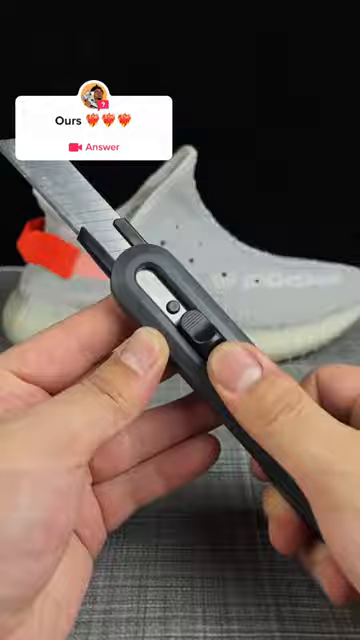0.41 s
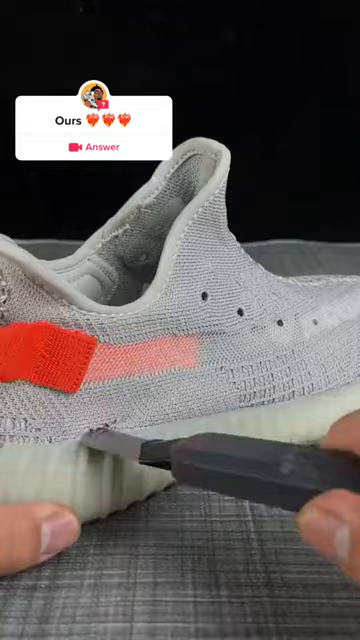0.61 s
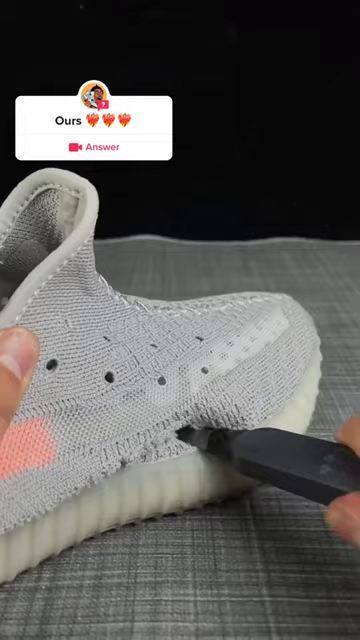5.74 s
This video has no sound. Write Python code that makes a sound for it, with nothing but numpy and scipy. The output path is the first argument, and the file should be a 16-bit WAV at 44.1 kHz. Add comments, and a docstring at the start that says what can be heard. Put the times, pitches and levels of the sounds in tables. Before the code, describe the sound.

A utility knife blade ratchets out with a quick run of clicks from 0.1 to 0.4 seconds. It brushes softly over a knit shoe, and a first stitch snaps at about 0.8 seconds. From 1.6 to 5.2 seconds the blade pokes along the seam about three times a second. Each push gives a short crunch of yarn, usually with a sharp snap, loudest between 1.6 and 3.4 seconds. In between, the foam sole thuds softly and the loose blade ticks in its holder. The sound drops out for an instant at 5.4 seconds. Then the blade saws back and forth through the knit until about 7 seconds, in quick scratchy strokes with gritty tearing and a few more snaps. Everything is close, in a small quiet room, over a faint hiss and a slowly swelling low hum.

```python
"""A small quiet room, where a utility knife works on a knit shoe close by.
The blade ratchets out, then pokes along the seam: stick-slip friction makes the yarn crunch, stitches
snap under tension, the foam sole thuds and the loose blade ticks against its holder. After a brief
dropout the blade saws to and fro through the knit, over a faint hiss and a low hum."""
import sys
import numpy as np
from scipy import signal
from scipy.fft import rfft, irfft
from scipy.io import wavfile
from scipy.ndimage import uniform_filter1d

SR = 44100
rng = np.random.default_rng(int(sys.argv[2]) if len(sys.argv) > 2 else 0)


def generate_wav(sig):
    """Save sig (samples, or channels by samples) to the path in sys.argv[1] as 16-bit PCM at SR."""
    pcm = np.round(np.clip(np.atleast_2d(sig).T, -1, 1) * 32767).astype(np.int16)
    wavfile.write(sys.argv[1], SR, pcm)


N = 317520
TIME = np.arange(N) / SR
AGE = np.arange(SR // 4) / SR  # time since an impact
HAND_TIME = np.arange(0, N / SR, .002)  # coarse time base of the strokes
DROPOUT_START_S, DROPOUT_END_S = 5.402, 5.44

# spectra of the yarn's low rasp, its high fizz and a light brush over it: frequency_hz, density_db
RASP_SPECTRUM = [(40, -1.5), (150, 5), (310, -1), (550, -1), (1100, -1), (2050, -11), (3400, -17.5),
                 (7000, -23), (16000, -39)]
FIZZ_SPECTRUM = [(600, -2), (2200, 4.5), (4500, -4), (6600, -7.5), (9500, -6.5), (16000, -16)]
BRUSH_SPECTRUM = [(100, -1), (300, -2), (520, 2.5), (1100, -6), (1900, -7.5), (3200, -19.5), (16000, -37)]
# spectrum of a crisp contact: frequency_hz, density_db
TICK_SPECTRUM = [(500, -8), (1500, 6.5), (10000, -0.5), (16000, -10)]


def amp(db):
    """Decibels to amplitude ratio."""
    return 10 ** (np.asarray(db) / 20)


def unit(x):
    """Normalisation to rms 1."""
    return x / np.sqrt(np.mean(x ** 2) + 1e-20)


def unit_onset(x, size=88):
    """Normalisation to rms 1 over the first samples."""
    return x / np.sqrt(np.mean(x[:size] ** 2) + 1e-20)


def log_interp(points, hz):
    """Interpolation on a logarithmic frequency axis."""
    frequency, value = np.transpose(points)
    return np.interp(np.log(hz + 1), np.log(frequency), value)


def add(mix, start_s, sound):
    """Superposition of a sound on the mix."""
    part = mix[max(round(start_s * SR), 0):][:len(sound)]
    part += sound[:len(part)]


def colour(x, spectrum):
    """Spectral shaping, at rms 1."""
    gain = amp(log_interp(spectrum, np.fft.rfftfreq(len(x), 1 / SR)))
    return unit(irfft(rfft(x) * gain, len(x)))


def noise(spectrum, size=len(AGE)):
    """Coloured Gaussian noise of rms 1."""
    return colour(rng.standard_normal(size), spectrum)


def decay(t60):
    """Exponential damping: 60 dB in t60 seconds."""
    return np.exp(-np.log(1000) * AGE / t60)


def impulses(per_s, spread_db, size=len(AGE)):
    """A Poisson process of small slips or contacts, a few of them large."""
    height = amp(spread_db * np.minimum(rng.exponential(1, size), 4))
    return height * rng.choice([-1, 1], size) * (rng.random(size) < per_s / SR)


def impact(spectrum, rebound_db, rebound_t60):
    """Impulsive excitation: a hard contact and its rebounds, with the energy of 2 ms at rms 1."""
    hits = amp(rebound_db) * impulses(4000, 1.0) * decay(rebound_t60)
    hits[0] = 1
    sound = colour(np.roll(hits, 32), spectrum) * (1 - decay(.001)) * decay(.5)
    return unit(sound) * np.sqrt(.002 / AGE[-1])


def stitch_snaps(twang_cycles=2.03, load_s=.00035, ring_hz=2150, crunch_s=0.0059, lead_s=0.05):
    """Sudden release of tension: a thread crunches, cracks and twangs; blade and shoe vibrate."""
    # parting stitches: time_s, level_db, pitch_hz, crack_db, shudder_db, crunch_db
    stitches = [(0.8408, -11.5, 1980, -43, -37, -26), (0.8486, -5.5, 1540, -34, -33.5, -29),
                (1.652, -0.5, 790, -15.5, -21.5, -60), (2.012, -1.5, 1020, -19.5, -23.5, -39),
                (2.3376, -3.5, 1000, -24, -21.5, -31.5), (2.651, -14.5, 880, -32.5, -50.5, -30.5),
                (2.675, -1.5, 1220, -20.5, -25, -24.5), (2.8724, -14, 1020, -55, -36, -35.5),
                (3.035, -5.5, 885, -22, -22, -32), (3.3631, -2, 913, -18, -18.5, -32),
                (3.698, -18, 800, -43, -23.5, -42), (4.043, -6.5, 960, -35.5, -20.5, -30),
                (4.392, -39, 500, -50, -22.5, -47), (4.7266, -15, 620, -55, -21, -60),
                (5.0436, -3.5, 840, -31.5, -22.5, -30.5), (5.3409, -25.5, 1020, -43, -36, -70),
                (5.712, -11, 1050, -29.5, -27, -28.5), (5.7495, -11.5, 1110, -35, -25.5, -45),
                (6.2323, -8, 400, -29.5, -40, -33), (6.4955, -20.5, 2160, -29, -55, -35)]
    # spectra of the crack and of the shoe's shudder: frequency_hz, density_db
    crack_spectrum = [(1000, 4), (2500, 6), (4500, -1), (6500, -7), (11000, -2.5), (16000, -26)]
    shudder_spectrum = [(40, -3), (150, 1), (290, -11.5), (420, -4), (900, -10.5), (1800, -23), (5000, -47),
                        (15000, -43)]
    direct, body = np.zeros(N), np.zeros(N)
    t = AGE - lead_s  # zero at the moment of parting
    for s, db, hz, crack_db, shudder_db, crunch_db in stitches:
        loading = np.exp(np.minimum(t, 0) / load_s)
        release = np.exp(-np.log(1000) * np.maximum(t, 0) * hz / twang_cycles)
        add(direct, s - lead_s, amp(db) * loading * release * np.sin(2 * np.pi * hz * t))
        blade_ring = np.sin(2 * np.pi * ring_hz * rng.uniform(.85, 1.15) * AGE) * decay(0.0064)
        add(direct, s, amp(db - 13) * blade_ring)
        add(direct, s - 2 * load_s, amp(crack_db) * impact(crack_spectrum, -10, 0.042))
        crunch = colour(impulses(1700, 0.92), RASP_SPECTRUM) * np.exp(-abs(t) / crunch_s)
        add(body, s - lead_s, 2 * amp(crunch_db) * crunch)
        # neighbouring loops give way in quick succession
        cascade = colour(impulses(1200, 0.75), shudder_spectrum) * decay(0.069) * (1 - decay(0.0033))
        add(body, s, amp(shudder_db) * unit_onset(cascade, size=800))
    return direct + amp(-3) * shoe_resonance(body)


def slider_ratchet(slide_db=-35, fade_db=-8):
    """Impact and sliding friction: the slider clacks over notches as the blade hisses along its track."""
    # jumps of one notch: start_s, level_db, t60_s
    notches = [(0.103, -23.5, 0.068), (0.122, -11, 0.0043), (0.138, -20.5, 0.035), (0.1537, -24, 0.033),
               (0.1719, -20.5, 0.034), (0.1913, -21.5, 0.042), (0.209, -23, 0.059), (0.2307, -25.5, 0.031),
               (0.2598, -22.5, 0.032), (0.2979, -19.5, 0.018), (0.3096, -37, 0.013), (0.3654, -17, 0.0087)]
    # bumps against the plastic handle: start_s, level_db
    bumps = [(0.101, -28), (0.1222, -27), (0.2973, -24), (0.3632, -25)]
    # spectra of the slider, the steel track and the handle: frequency_hz, density_db
    slider_spectrum = [(100, -42), (750, -17), (1350, 0.5), (2200, 3.5), (2750, -3.5), (3650, 7),
                       (4500, -0.5), (5400, 1.5), (6500, -5), (9800, 3), (16000, -3.5)]
    track_spectrum = [(200, -45), (900, -18), (1900, -4), (3800, -4.5), (6500, -9), (8000, -2.5),
                      (10300, -0.5), (16000, -28)]
    handle_spectrum = [(40, -25), (200, -4), (800, -2), (1400, 3), (2200, -11.5)]
    out = np.zeros(N)
    for s, db, t60 in notches:
        teeth = impulses(7500, 0.31) * decay(t60) * (1 - decay(0.0013))
        clack = unit_onset(colour(np.roll(teeth, 20), slider_spectrum) * decay(1))
        rattle = colour(impulses(3000, 2.0), track_spectrum) * decay(.07) * (1 - decay(.02))
        add(out, s, amp(db) * clack + amp(db / 2 - 19) * rattle)
    for s, db in bumps:
        add(out, s, amp(db) * impact(handle_spectrum, -4.0, 0.012))
    start_s, stop_s = notches[0][0], notches[-1][0]
    size = int((stop_s - start_s) * SR)
    slowing = amp(np.linspace(0, fade_db, size)) * signal.windows.tukey(size, .2)
    add(out, start_s, amp(slide_db) * noise(track_spectrum, size) * slowing)
    return out


def blade_ticks(buzz_db=-21, buzz_t60=0.089):
    """Impact with rebound: the loose blade hits its holder, exciting broad resonances and a faint buzz."""
    # knocks in the holder: start_s, level_db, mode_hz, edge_db
    knocks = [(1.0678, -36, 2350, -38), (1.7787, -30, 2400, -36.5), (2.0573, -35.5, 2740, -32),
              (2.1451, -21, 2450, -31), (2.486, -34, 2560, -34.5), (2.794, -34, 2370, -64),
              (2.8092, -19, 2560, -35), (3.063, -41, 2670, -37), (3.163, -33.5, 2120, -33),
              (3.383, -30, 2830, -34), (3.507, -32, 2250, -63), (3.7313, -40, 2640, -42),
              (3.8434, -18, 2430, -37), (4.428, -39.5, 2660, -45), (4.5245, -19, 2530, -32),
              (4.6999, -36.5, 2688, -36.5), (4.772, -40, 2830, -50), (5.07, -45, 3070, -47),
              (5.1579, -25, 2300, -53)]
    # broad resonances of the blade: ratio_to_mode, density_db
    blade_resonances = [(.2, -19.5), (.6, -15), (1, 6.5), (1.35, -4.5), (1.66, 0.5), (2.15, -4), (2.7, -31),
                        (3.3, -17), (6.5, -56)]
    out = np.zeros(N)
    for s, db, hz, edge_db in knocks:
        spectrum = [(ratio * hz, level) for ratio, level in blade_resonances]
        click = amp(db) * impact(spectrum, -8, 0.023)
        edge = amp(edge_db) * impact(TICK_SPECTRUM, -9, 0.053)
        buzz = amp(db + buzz_db) * noise(spectrum) * decay(buzz_t60)
        add(out, s, amp(2) * (click + edge) + buzz)
    return out


def handle_clicks(t60=0.012, mode_ratio=1.163, contact_db=-18):
    """Free vibration: a crisp contact rings the handle's plastic shell in a close pair of modes."""
    # contacts of slider or grip: start_s, level_db, pitch_hz
    contacts = [(0.1218, -9.5, 1276), (1.9332, -26.5, 2030), (1.9642, -15.5, 2400), (6.2319, -14.5, 2116)]
    out = np.zeros(N)
    for s, db, hz in contacts:
        phase = 2 * np.pi * hz * AGE
        ring = (np.sin(phase) - np.sin(mode_ratio * phase)) * decay(t60) * (1 - decay(0.0034))
        contact = impact(TICK_SPECTRUM, -6, .03)
        add(out, s, amp(db) * (ring + amp(contact_db) * contact))
    return out


def sole_thuds(t60=0.072, sag=0.84, mode_ratio=1.77, upper_db=-7):
    """Damped oscillation: the foam sole springs back, its pitch sagging as the pressure comes off."""
    # flexes of the sole: start_s, level_db, mid_pitch_hz
    flexes = [(0.891, -22.5, 97), (1.82, -19, 114), (2.16, -17.5, 140), (2.498, -24, 107), (2.83, -19, 147),
              (2.858, -20.5, 160), (2.9333, -17, 351), (4.378, -17, 145), (4.518, -23, 113),
              (4.726, -19, 139), (5.028, -16.5, 159), (6.073, -26, 170), (6.231, -17, 196)]
    out = np.zeros(N)
    for s, db, hz in flexes:
        pitch_hz = hz * (1 + sag * (decay(0.061) - .5))
        phase = 2 * np.pi * np.cumsum(pitch_hz) / SR
        wobble = np.sin(phase) + amp(upper_db) * np.sin(mode_ratio * phase)
        add(out, s, amp(db) * wobble * decay(t60) * (1 - decay(0.0082)))
    return out


def stroke_power(start_s, hold_s, db, shape):
    """Exponential swell, hold and fade of one stroke, as rasp power and fizz power."""
    rise, fall, fizz_db = shape
    before_s = np.maximum(start_s - HAND_TIME, 0)
    after_s = np.maximum(HAND_TIME - start_s - hold_s, 0)
    level = db - rise * before_s - fall * after_s
    return amp([level, level + fizz_db]) ** 2


def poking_power(push_s=0.033, pull_s=0.039):
    """Incoherent sources add in power: the rasp and fizz of each push into the seam and each pull back."""
    # pokes: deepest_s, push_db, wait_s, pull_db
    pokes = [(1.668, -37.5, 0.14, -41.5), (1.988, -36.5, 0.17, -42.5), (2.33, -37.5, .19, -40.5),
             (2.673, -37, 0.17, -36.5), (3.052, -38.5, 0.13, -44.5), (3.358, -36, 0.14, -46),
             (3.7, -36, 0.12, -47), (4.047, -36.5, 0.14, -54), (4.384, -37.5, 0.13, -45),
             (4.709, -34.5, 0.14, -52), (5.034, -40, 0.15, -50)]
    # stroke envelopes: rise_db_per_s, fall_db_per_s, fizz_over_rasp_db
    push_shape = (600, 430, -12)
    pull_shape = (550, 260, -9)
    return sum(stroke_power(s - push_s / 2, push_s, push_db, push_shape)
               + stroke_power(s + wait_s, pull_s, pull_db, pull_shape)
               for s, push_db, wait_s, pull_db in pokes)


def sawing_power(return_s=0.058):
    """Reciprocating friction, as rasp and fizz power: each cut bites at once, each return creeps in."""
    # saw strokes: start_s, hold_s, cut_db, wait_s, return_db
    saws = [(5.431, 0.0091, -39, 0.12, -42.5), (5.692, 0.052, -37, 0.19, -45.5),
            (6.018, 0.059, -38.5, 0.16, -44.5), (6.321, 0.014, -33.5, 0.15, -42.5),
            (6.61, 0.058, -35, 0.18, -39.5), (6.917, 0.063, -35, 0.17, -40)]
    # stroke envelopes: rise_db_per_s, fall_db_per_s, fizz_over_rasp_db
    cut_shape = (870, 374, -7.5)
    return_shape = (345, 500, -2.5)
    return sum(stroke_power(s, hold_s, cut_db, cut_shape)
               + stroke_power(s + wait_s, return_s, return_db, return_shape)
               for s, hold_s, cut_db, wait_s, return_db in saws)


def power_to_gain(power):
    """Amplitude is the square root of power, here interpolated to every sample."""
    return np.interp(TIME, HAND_TIME, np.sqrt(power))


def uneven_grip(loops_hz, depth_db):
    """Random amplitude modulation: the grip of the edge varies from loop to loop."""
    knots = np.arange(0, TIME[-1], .5 / loops_hz)
    return unit(amp(depth_db * np.interp(TIME, knots, rng.standard_normal(len(knots)))))


def yarn_drag(resting_rasp_db=-57.5, resting_fizz_db=-64):
    """Stick-slip friction: the edge catches loop after loop, with a rasp, a fizz and single-fibre pops."""
    resting = amp([[resting_rasp_db], [resting_fizz_db]]) ** 2  # the edge never quite leaves the knit
    rasp_power, fizz_power = resting + poking_power() + sawing_power()
    grip = uneven_grip(loops_hz=130, depth_db=3.0)
    pops = amp(-15) * unit(impulses(45, 2.5, N))
    coarse_slips = unit(grip * impulses(2200, 2.8, N))
    fine_slips = unit(grip * impulses(12000, 1.0, N))
    rasp = amp(-2) * colour(coarse_slips + pops, RASP_SPECTRUM) * power_to_gain(rasp_power)
    fizz = colour(fine_slips + pops / 2, FIZZ_SPECTRUM) * power_to_gain(fizz_power)
    return shoe_resonance(rasp) + fizz


def fibre_tearing(bite_hz=1990, bite_q=4.3, bite_db=-11, catch_t60=0.056):
    """Fracture under the sawing edge: single fibres tear in a gritty band, tough loops in a crackle."""
    # tough loops catching on the edge: start_s, level_db
    catches = [(5.536, -41), (5.591, -32.5), (6.018, -32.5), (6.079, -34.5), (6.316, -36), (6.63, -31.5),
               (6.918, -33), (6.968, -42)]
    grit = signal.lfilter(*signal.iirpeak(bite_hz, bite_q, SR), impulses(500, 3.0, N))
    out = amp(bite_db) * power_to_gain(sawing_power()[0]) * unit(grit)
    for s, db in catches:
        crackle = impact(BRUSH_SPECTRUM, 0, catch_t60) + impact(FIZZ_SPECTRUM, 0, catch_t60)
        add(out, s, amp(db) * crackle)
    return out


def knit_rubs(rise_db_per_s=420, fall_db_per_s=230):
    """Light sliding friction: the blade brushes the ribs of the knit with a soft grain and some fizz."""
    # light strokes: start_s, hold_s, brush_db, fizz_db
    rubs = [(0.454, 0.14, -50, -57.5), (0.749, 0.093, -49, -53), (0.886, 0.0043, -35.5, -65),
            (1.002, 0.25, -45, -58.5), (1.451, 0.0044, -41.5, -46.5), (2.827, 0.092, -46.5, -51.5)]
    shape = (rise_db_per_s, fall_db_per_s, 0)
    brush_power = sum(stroke_power(s, hold_s, db, shape)[0] for s, hold_s, db, _ in rubs)
    fizz_power = sum(stroke_power(s, hold_s, db, shape)[1] for s, hold_s, _, db in rubs)
    brush = power_to_gain(brush_power) * colour(impulses(6000, 1.0, N), BRUSH_SPECTRUM)
    fizz = power_to_gain(fizz_power) * colour(impulses(5000, 2.0, N), FIZZ_SPECTRUM)
    return uneven_grip(loops_hz=35, depth_db=2.5) * (brush + fizz)


def blade_glides(rise=.25):
    """Periodic excitation: steel crosses evenly spaced filaments, and the swish rises with its speed."""
    # glides of the flat of the blade: start_s, length_s, level_db, centre_hz
    glides = [(0.715, 0.12, -57.5, 7030), (2.842, 0.12, -49.5, 6150)]
    out = np.zeros(N)
    for s, length_s, db, hz in glides:
        size = int(length_s * SR)
        pitch_hz = hz * (1 + rise * np.linspace(-.5, .5, size))
        phase = 2 * np.pi * np.cumsum(pitch_hz) / SR
        swish = unit(noise([(500, 5), (1500, -5), (5000, -42)], size) * np.sin(phase))
        add(out, s, amp(db) * swish * signal.windows.tukey(size, .5))
    return out


def shoe_resonance(x, width_hz=36):
    """Modal filtering: shoe and knife add narrow peaks, which shift when the shoe is held for sawing."""
    # modes while poking and while sawing: frequency_hz, gain_db
    poking_modes = [(190, -1.5), (335, 1.5), (400, -1), (535, -2.5), (640, 1), (825, 4.5), (1010, 0.5)]
    sawing_modes = [(205, 2.5), (550, 1.5), (790, 0.5), (1030, 5), (2400, -1)]
    regripped = TIME > DROPOUT_START_S
    out = x.copy()
    for drive, modes in (x * ~regripped, poking_modes), (x * regripped, sawing_modes):
        for hz, db in modes:
            out += amp(db) * signal.lfilter(*signal.iirpeak(hz, hz / width_hz, SR), drive + 1e-12)
    return out


def room_reverb(x, wet_db=-19):
    """Reverberation: reflections from the walls add a faint, short, diffuse tail."""
    # reverberation times: frequency_hz, t60_s
    decay_times = [(200, 0.36), (6000, 0.11), (16000, 0.23)]
    hz, t, bands = signal.stft(rng.standard_normal(SR // 2), SR, nperseg=256)
    damping = np.exp(-np.log(1000) * t / log_interp(decay_times, hz)[:, None])
    tail = signal.istft(bands * damping, SR, nperseg=256)[1]
    tail[:SR // 200] = 0  # the first reflection takes 5 ms
    return x + amp(wet_db) * signal.fftconvolve(x, tail / np.linalg.norm(tail))[:N]


def room_tone(hiss_db=-47.5, hum_hz=49.3):
    """Ambient noise: a steady hiss and a swelling low hum that wavers by amplitude modulation."""
    # spectrum of the hiss: frequency_hz, density_db
    hiss_spectrum = [(15, 0.5), (45, -9), (65, -4.5), (200, -9), (290, -21.5), (600, -16.5), (1200, -33.5),
                     (3000, -32.5), (16000, -41)]
    # swell of the hum: time_s, level_db
    hum_levels = [(0, -53.5), (7, -45)]
    waver = noise([(4, -11), (14, -37), (40, -120)], N)
    hum = unit((1 + 0.72 * waver) * np.sin(2 * np.pi * hum_hz * TIME))
    swell = amp(np.interp(TIME, *np.transpose(hum_levels)))
    return amp(hiss_db) * noise(hiss_spectrum, N) + swell * hum


def scene():
    """Superposition of knife, shoe and room in one channel."""
    impacts = slider_ratchet() + stitch_snaps() + blade_ticks() + handle_clicks() + sole_thuds()
    friction = yarn_drag() + knit_rubs() + fibre_tearing() + blade_glides()
    return (room_reverb(impacts + friction) + room_tone())[None]


def record(dry, cutoff_hz=15950):
    """Gating, clipping and band limiting: the sound drops out briefly and loses its peaks and its top."""
    dropout = (TIME > DROPOUT_START_S) & (TIME < DROPOUT_END_S)
    gain = 1 - .97 * uniform_filter1d(1. * dropout, size=200)
    clipped = np.clip(dry * gain, -1, 1)
    lowpass = signal.firwin(401, cutoff_hz, window=("kaiser", 8), fs=SR)
    return signal.oaconvolve(clipped, lowpass[None], "same")


dry = scene()
out = record(dry)
generate_wav(out)
```